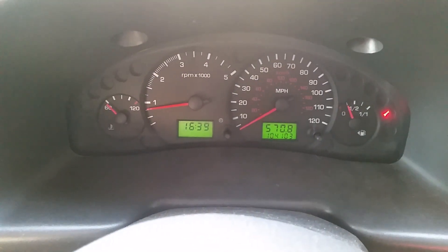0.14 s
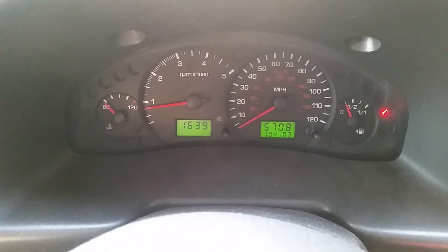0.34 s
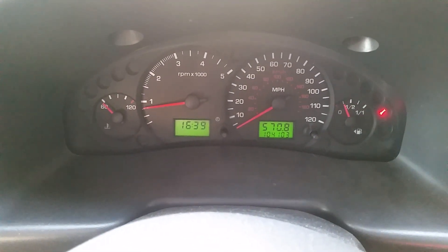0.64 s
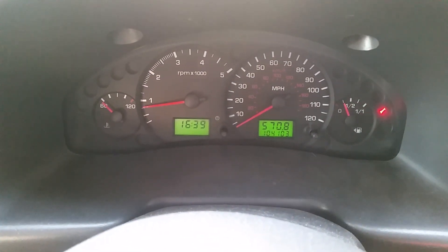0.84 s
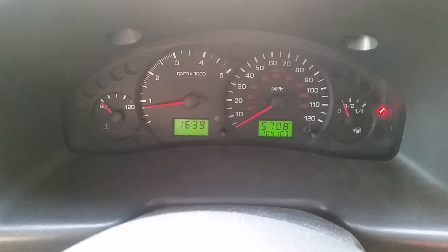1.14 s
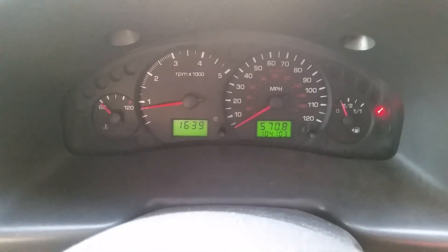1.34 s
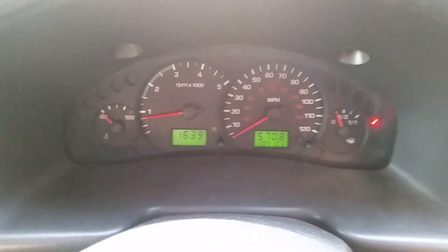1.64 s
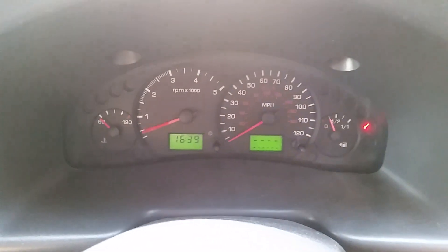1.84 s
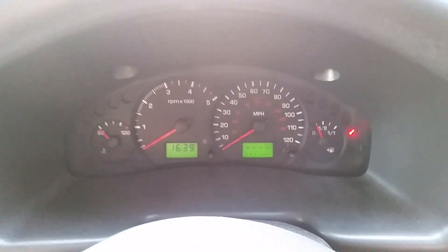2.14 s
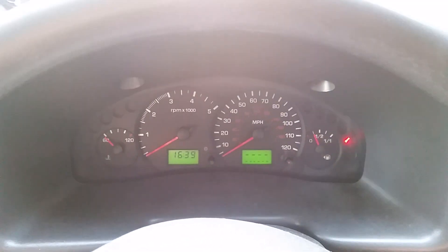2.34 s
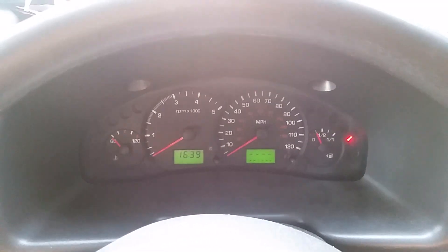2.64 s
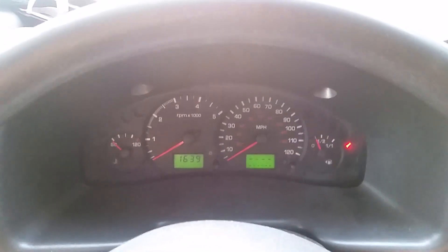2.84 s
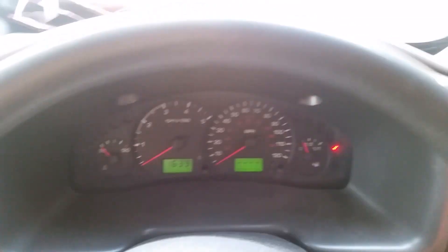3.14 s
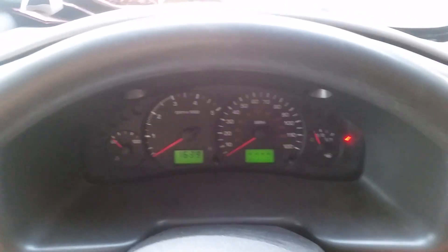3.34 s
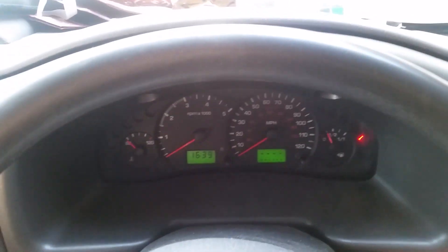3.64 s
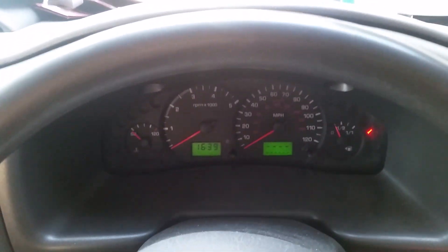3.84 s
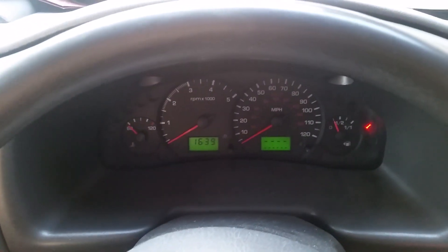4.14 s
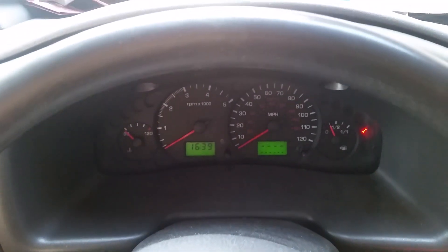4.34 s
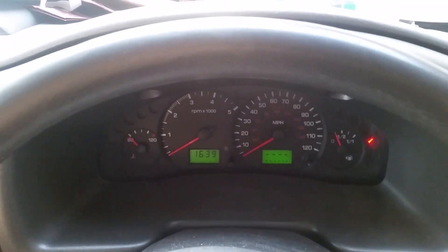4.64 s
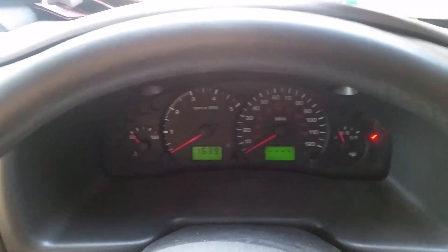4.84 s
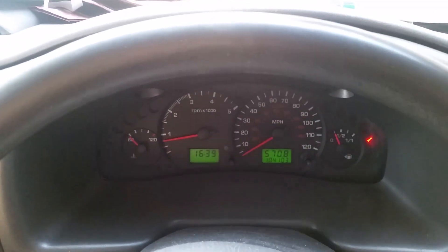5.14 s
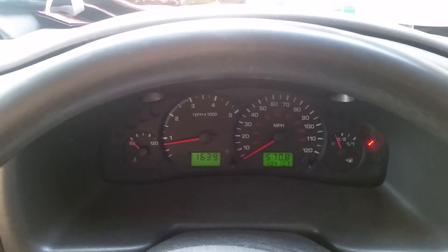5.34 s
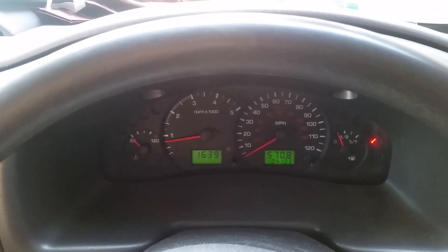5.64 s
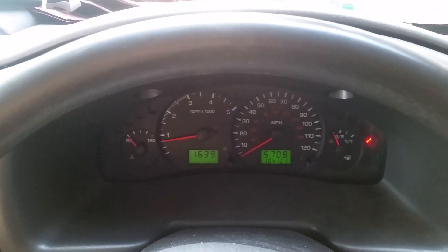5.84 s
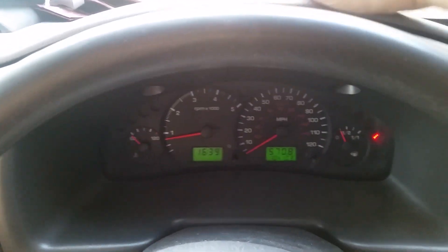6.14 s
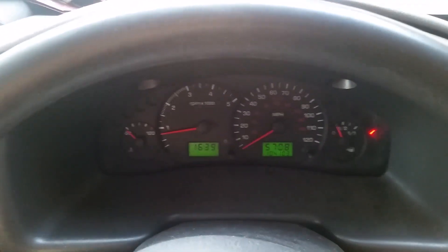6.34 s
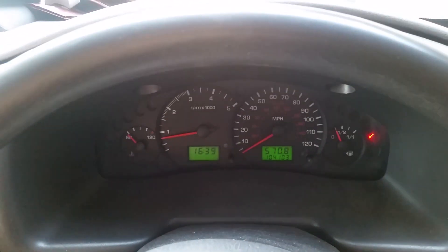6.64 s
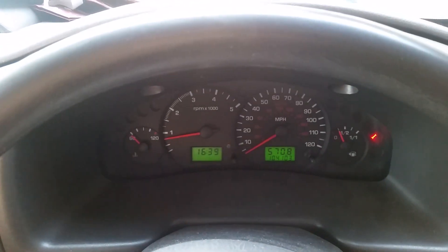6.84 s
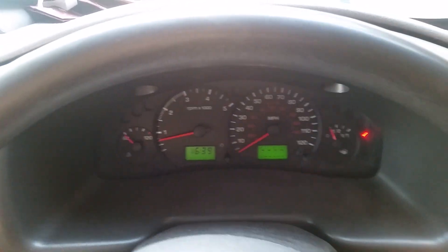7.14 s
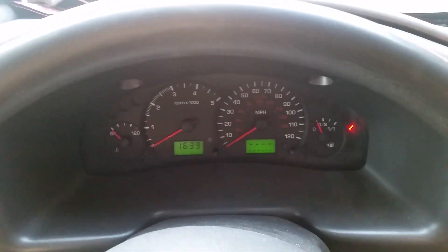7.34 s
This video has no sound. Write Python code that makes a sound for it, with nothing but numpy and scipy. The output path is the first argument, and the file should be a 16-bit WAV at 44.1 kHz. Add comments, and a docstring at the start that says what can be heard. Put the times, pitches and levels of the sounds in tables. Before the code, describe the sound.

A diesel van idles steadily with a boomy metallic knock inside the cabin, while two hard hand slaps on the dashboard briefly duck the sound.

```python
"""A four-cylinder diesel van idles, heard from the driver's seat through a hand-held phone that opens turned down.
Firing pulses drive the cabin air into a boom, and metallic blows ring the bulkhead and the block; a faint hiss lies over.
A whining rustle of noise and narrow resonances comes and goes; a sleeve swishes as noise while the phone is drawn back.
Trim ticks in short noise bursts, plastic squeaks with an arching tone, and the hand bumps the phone as its grip shifts.
Then a hand slaps the dashboard twice, ringing its modes; each time the gain control ducks, holds and recovers."""
import sys
import numpy as np
from scipy import signal
from scipy.fft import rfft, irfft, next_fast_len
from scipy.io import wavfile
from scipy.ndimage import uniform_filter1d, minimum_filter1d

SR = 44100
rng = np.random.default_rng(int(sys.argv[2]) if len(sys.argv) > 2 else 0)


def waveform_to_disk(signal):
    """Save audio, clipped to [-1, 1], as 16-bit WAV at the path in sys.argv[1]."""
    frames = np.transpose(np.atleast_2d(signal))
    scaled = np.clip(frames, -1, 1) * 32767
    samples = np.round(scaled).astype(np.int16)
    wavfile.write(sys.argv[1], SR, samples)


N = 330309
T = np.arange(N) / SR  # seconds


def undb(db):
    """Logarithmic level: turn decibels into an amplitude gain."""
    return 10 ** (np.asarray(db) / 20)


def level(x, db):
    """Effective value: scale a sound to an rms level in dB."""
    return x * undb(db) / np.sqrt(np.mean(x ** 2))


def along(points, hz):
    """Logarithmic pitch: interpolate (Hz, value) points along a log-frequency axis."""
    f, value = np.transpose(points)
    return np.interp(np.log(hz + 1), np.log(f), value)


def through(x, response):
    """Linear superposition: convolve a sound with an impulse response."""
    return signal.fftconvolve(x, response)[:len(x)]


def colour(x, points, size=16384):
    """Minimum phase: a folded cepstrum gives the causal filter with this (Hz, dB) shape."""
    log_gain = np.log(undb(along(points, np.fft.rfftfreq(size, 1 / SR))))
    cepstrum = irfft(log_gain)
    cepstrum[1:size // 2] *= 2
    cepstrum[size // 2 + 1:] = 0
    return through(x, irfft(np.exp(rfft(cepstrum))))


# Sound scattered by glass and trim, different at each microphone.
# Each row: frequency in Hz, level in dB against the direct sound.
SCATTERED_SOUND = [(60, -8.5), (250, -2.5), (1000, 4), (8000, 8.5)]


def noise(points, count=N):
    """Partial coherence: two-channel noise of rms 1, a shared direct part plus separate scatter."""
    hz = np.fft.rfftfreq(next_fast_len(count, real=True), 1 / SR)
    white = rng.standard_normal((3, len(hz))) + 1j * rng.standard_normal((3, len(hz)))
    direct, scattered = white[0], white[1:] * undb(along(SCATTERED_SOUND, hz))
    spectrum = (direct + scattered) * undb(along(points, hz))
    return level(irfft(spectrum)[:, :count], 0)


def impulses(times, sizes):
    """Impulsive excitation: one impulse of the given size at each time."""
    samples = np.clip(np.asarray(times) * SR, 0, N).astype(int)
    return np.bincount(samples, sizes, N + 1)[:N]


def fade(t60, rise):
    """Exponential decay: a one-second envelope that swells (rise, s) and dies away (t60, s)."""
    t = T[:SR]
    return (1 - np.exp(-t / rise)) * np.exp(-np.log(1000) * t / t60)


def ring(modes, rise):
    """Modal superposition: the impulse response of (Hz, dB, t60) modes is a sum of decaying sines."""
    return sum(undb(db) * fade(t60, rise) * np.sin(2 * np.pi * hz * T[:SR]) for hz, db, t60 in modes)


def swell(middle_s, spread_s):
    """Gaussian envelope: a bell-shaped rise and fall."""
    return np.exp(-.5 * ((T - middle_s) / spread_s) ** 2)


START_TURN = .264  # share of a firing period already gone at 0 s
# the idle starts a little fast and settles: firings per second, extra firings per second, time constant
IDLE_HZ, FAST_HZ, SETTLE_S = 26.651, .28, .5


def firings():
    """Phase accumulation: a cylinder fires whenever the running phase passes a whole number."""
    rate = IDLE_HZ + FAST_HZ * np.exp(-T / SETTLE_S)
    turns = START_TURN + np.cumsum(rate) / SR
    number = np.arange(int(turns[-1]) + 1)
    return np.interp(number, turns, T), rate.mean()


# Air modes of the cabin, in which the push lingers. Each row: frequency in Hz, width in Hz.
CABIN_AIR_MODES = [(75, 10), (104.7, 10), (212.8, 10)]


def smear(x):
    """Group delay: all-pass filters make sound near a mode of the cabin air arrive late."""
    for hz, width_hz in CABIN_AIR_MODES:
        poles = signal.iirpeak(hz, hz / width_hz, fs=SR)[1]
        x = signal.lfilter(poles[::-1], poles, x)
    return x


# Spectrum of the cabin boom. Each row: multiple of the firing rate, relative level in dB.
BOOM_ORDERS = [(1, 3.5), (2, -6), (3, -7.5), (4, -14.5), (5, -6.5), (6, -11), (7, -18), (8, -14.5),
               (9, -19.5), (10, -20), (11, -19.5), (12, -22.5), (13, -25.5), (14, -32), (15, -52.5),
               (16, -46.5)]


def cabin_boom(times, mean_rate, push):
    """Harmonic excitation: the cabin air passes only the low orders of the periodic push."""
    orders = [(k * mean_rate, db) for k, db in BOOM_ORDERS]
    shape = [(12, -25)] + orders + [(700, -55), (2000, -100)]
    return smear(colour(impulses(times, undb(0.35 * push)), shape))


# Knock strength of the cylinders. Each entry: relative level in dB, in firing order.
CYLINDER_KNOCKS_DB = [-2.65, -0.26, -1.9, -0.099]
# Metallic blows within every firing. Each row: delay in ms, relative level in dB.
FIRING_BLOWS = [(3.55, -3.6), (6.97, 0), (13.1, 0), (18.13, -4), (22.01, -4)]


def metallic_blows(times, force, late):
    """Impact excitation: unequal cylinders strike runs of blows that limp once in four firings."""
    strength = undb(np.resize(CYLINDER_KNOCKS_DB, len(times)) + 0.47 * force)
    blows = np.zeros(N)
    for ms, db in FIRING_BLOWS:
        scatter_db = .4 * rng.standard_normal(len(times))
        blows += impulses(times + ms / 1000 + .00004 * late, strength * undb(db + scatter_db))
    return blows, strength


# the phone starts near the bulkhead and is drawn back: extra ring while near, middle and spread of the move
NEAR_DB, DRAW_BACK_S, DRAW_SPREAD_S = 3, 2.105, 0.33
# Modes of the bulkhead. Each row: frequency in Hz, relative level in dB, t60 in seconds.
BULKHEAD_MODES = [(319, -9.5, .17), (501.6, 1.2, .16), (530.4, -9.5, .137), (585, -11, .12),
                  (699.5, -.5, .085), (850, -4.5, .07), (1510, -17, .079)]


def bulkhead_knock(blows):
    """Modal resonance: blows ring the bulkhead, louder while the phone is near it."""
    near = undb(NEAR_DB * (1 - np.tanh((T - DRAW_BACK_S) / DRAW_SPREAD_S)) / 2)
    return near * through(blows, ring(BULKHEAD_MODES, rise=0.0012))


# Spectrum of block and loose clatter. Each row: frequency in Hz, relative level in dB per Hz.
CLATTER_SPECTRUM = [(400, -22), (800, 6), (1200, 4.5), (1550, 4), (2000, -0.5), (2400, -6), (2950, 2),
                    (3600, -4), (4500, -17.5), (6000, -36), (9000, -44.5)]


def block(blows):
    """High modal density: countless modes answer every blow with the same short noise burst."""
    burst = noise(CLATTER_SPECTRUM)[:, :SR] * fade(t60=0.18, rise=0.0024)
    return np.array([through(blows, side) for side in burst])


def loose_clatter(flare):
    """Amplitude modulation: a steady clatter flares with each knock."""
    return noise(CLATTER_SPECTRUM) * (1 + 0.06 * flare)


# Spectrum of the rumble. Each row: frequency in Hz, relative level in dB per Hz.
RUMBLE_SPECTRUM = [(20, -29), (55, -3), (100, -3.5), (160, -8), (270, -3), (340, -9.5), (395, -12.5),
                   (520, -11.5), (700, -14), (1100, -36.5), (2000, -59)]


def rumble(flare):
    """Amplitude modulation: a steady low churn flares with each knock."""
    return noise(RUMBLE_SPECTRUM) * (1 + 0.12 * flare)


RATTLE_DELAY_S = 0.00856
# Spectrum of rattling panels. Each row: frequency in Hz, relative level in dB per Hz.
RATTLE_SPECTRUM = [(200, -30), (400, -10), (560, 13.5), (680, -3), (860, -17), (1200, -15.5), (2500, -31),
                   (6000, -77)]


def panel_rattle(times, strength):
    """Gated noise: panels rattle once, a little late, in every firing."""
    shakes = impulses(times + RATTLE_DELAY_S, strength)
    return noise(RATTLE_SPECTRUM) * through(shakes, fade(t60=0.035, rise=0.0037))


def engine():
    """Common excitation: every firing pushes the cabin air and sets off a quick run of metallic blows."""
    times, mean_rate = firings()
    push, force, late = rng.standard_normal((len(times), 3)).T
    blows, strength = metallic_blows(times, force, late)
    flare = level(through(blows, fade(t60=0.11, rise=0.001)), 0)
    low = level(cabin_boom(times, mean_rate, push), -25.5) + level(rumble(flare), -37.0)
    knock = level(bulkhead_knock(blows), -37.5) + level(block(blows), -52.5)
    loose = level(panel_rattle(times, strength), -46.0) + level(loose_clatter(flare), -48.0)
    return low + knock + loose


# Spectrum of the faint hiss. Each row: frequency in Hz, relative level in dB per Hz.
HISS_SPECTRUM = [(1000, 1), (5000, -10.5), (7200, -36), (9000, -1), (12000, 1.5), (15500, 7)]


def faint_hiss():
    """Stationary noise: a steady, shaped random signal."""
    return undb(-58) * noise(HISS_SPECTRUM)


WHINE_EDGE_S = 0.08
# Passages of the rustle. Each row: start in seconds, end in seconds, level in dB.
WHINE_PASSAGES = [(1.333, 1.95, -60.5), (3.97, 4.62, -63.5), (4.9, 5.245, -33.5), (7.31, 7.602, -49)]
# Narrow resonances in the rustle. Each row: frequency in Hz, width in Hz, relative level in dB.
WHINE_RESONANCES = [(4900, 89.4, -5), (6250, 110, -9), (8300, 280, -4.5), (10450, 200, -6.5),
                    (11500, 130, -4.5)]
# Spectrum of the hiss around them. Each row: frequency in Hz, relative level in dB per Hz.
RUSTLE_SPECTRUM = [(3000, -18), (5000, -7.5), (7000, -8.5), (10500, -1.5), (12000, -8), (13500, -5),
                   (16000, -13.5)]


def whine():
    """Resonant filtering: narrow peaks make a high rustle whine as it fades in, holds and fades out."""
    gate = np.zeros(N)
    for start, end, db in WHINE_PASSAGES:
        opening, closing = np.tanh((T - start) / WHINE_EDGE_S), np.tanh((T - end) / WHINE_EDGE_S)
        gate += undb(db) * (opening - closing) / 2
    air = noise(RUSTLE_SPECTRUM)
    tones = np.zeros_like(air)
    for hz, width, db in WHINE_RESONANCES:
        tones += undb(db) * signal.lfilter(*signal.iirpeak(hz, hz / width, fs=SR), air)
    return gate * level(air + level(tones, -5), 0)


# Spectrum of the sliding sleeve. Each row: frequency in Hz, relative level in dB per Hz.
SLEEVE_SPECTRUM = [(500, -1), (1600, 14), (3000, 8.5), (4500, 6.5), (6500, 1), (8500, 6.5), (15500, 6)]


def sleeve():
    """Friction noise: a sleeve slides as the phone is drawn back."""
    return undb(-42.0) * swell(DRAW_BACK_S, 0.13) * noise(SLEEVE_SPECTRUM)


# Ticks of plastic trim. Each row: start in seconds, level in dB, centre in Hz, half width in octaves.
TRIM_TICKS = [(2.689, -52, 12000, 0.41), (2.813, -40.5, 3580, .22), (3.797, -52, 10500, 0.73),
              (3.887, -49, 11500, 1.0), (4.777, -57, 9000, 1), (6.065, -46.5, 4300, 0.15),
              (6.101, -55, 9500, 0.45), (6.435, -31, 10200, 0.98)]


def trim_ticks():
    """Band-limited transient: each tick is a quickly dying burst of noise around one centre."""
    out = np.zeros((2, N))
    # steps in half widths, with the level there in dB
    skirts = ((-4, -35), (-1, -10), (0, 0), (1, -12), (4, -26))
    for s, db, hz, octaves in TRIM_TICKS:
        shape = [(hz * 2 ** (octaves * step), skirt_db) for step, skirt_db in skirts]
        tick = fade(t60=0.09, rise=0.00089) * noise(shape, count=SR)
        out[:, int(s * SR):int(s * SR) + SR] += undb(db) * tick
    return out


def squeak(at_s=2.775, length_s=.13, top_hz=5250, sag_hz=850, db=-54.5):
    """Frequency modulation: plastic slips on plastic in a thin, rough tone that arches up and back."""
    place = np.clip(2 * (T - at_s) / length_s, -1, 1)
    hz = top_hz - sag_hz * place ** 2 + 700 * rng.standard_normal(N)
    return undb(db) * (1 - place ** 2) * np.sin(2 * np.pi * np.cumsum(hz) / SR)


# the hand shifts its grip on the phone: middle and spread, gain of its soft bumps
GRIP_S, GRIP_SPREAD_S, GRIP_DB, BUMPS_PER_S = 3.76, 0.21, -29, 9


def grip(count=80):
    """Random impacts: fingers bump the phone at uneven intervals while the grip shifts."""
    times = (np.arange(count) + rng.random(count)) / BUMPS_PER_S
    touches = impulses(times, np.ones(count)) * undb(GRIP_DB) * swell(GRIP_S, GRIP_SPREAD_S)
    thud = noise([(30, -2), (70, -1.5), (150, 3), (260, -16.5), (1000, -66.5)])
    return through(touches, fade(t60=0.39, rise=0.0067)) * thud


# each flight of the panel as a share of the last; first clap's thump against the slap, then change per clap
REBOUND, CLAP_THUMP_DB, CLAP_LOSS_DB = 1, -31, -16.5
# Hand slaps. Each row: start in seconds, thump in dB, crack in dB, approximate length of the push in ms,
# first flight of the loose panel in seconds, its first clap in dB against the crack.
HAND_SLAPS = [(4.8337, 2.5, -11.5, 3.33, .057, -5.5), (6.1859, -2, -14, 1.66, .034, -8.5)]
# Modes of the dashboard. Each row: frequency in Hz, relative level in dB, t60 in seconds.
DASH_MODES = [(62.5, -20.5, 0.44), (86.8, -11.5, 0.39), (112.8, -8.5, 0.17), (140.3, -14, 0.37),
              (167.5, -2.5, 0.15), (207, 3, 0.066), (249.3, 2, 0.066), (325, -5.5, 0.085)]
# Dull echo of the cabin after a thump. Each row: frequency in Hz, relative level in dB per Hz.
CABIN_ECHO = [(35, -20), (70, -3), (110, -3), (220, -5), (400, -21.5), (1000, -19.5), (3000, -48)]
# Stiff modes of the plastic trim. Each row: frequency in Hz, relative level in dB, t60 in seconds.
TRIM_MODES = [(653, -10.5, 0.13), (838, -18, 0.21), (995, -9.5, .22), (1320, -23.5, 0.22),
              (1694, -7.5, 0.14), (2010, -28, 0.22), (2375, -20, 0.15), (15300, -34, .45)]
# Spectrum of the crack. Each row: frequency in Hz, relative level in dB per Hz.
CRACK_SPECTRUM = [(40, -13.5), (130, 3), (300, 17), (450, 7), (700, 11.5), (1100, 3), (1900, -1.5),
                  (2800, -5.5), (4000, -17.5), (6300, -46.5), (8500, -20), (15500, -22)]


def dashboard(count=3):
    """Impact and rebound: a slap cracks and bends the panel, which claps back evenly and ever softer."""
    clap = np.arange(count)
    force, contacts = np.zeros(N), np.zeros(N)
    for s, thump_db, crack_db, push_ms, flight_s, clap_db in HAND_SLAPS:
        times = s + np.r_[0, np.cumsum(flight_s * REBOUND ** clap)]
        # a longer push sounds deeper
        push = np.hanning(int(push_ms * SR / 1000) + 3)
        weights = undb(thump_db + np.r_[0, CLAP_THUMP_DB + CLAP_LOSS_DB * clap])
        force += through(impulses(times + 0.00309, weights), push / push.sum())
        contacts += impulses(times, undb(crack_db + np.r_[0, clap_db + CLAP_LOSS_DB * clap]))
    thump = through(force, ring(DASH_MODES, rise=0.0027))
    echo = undb(-10) * through(force, fade(t60=0.24, rise=0.0043)) * noise(CABIN_ECHO)
    skin = fade(t60=.025, rise=.0002)
    plastic = fade(t60=0.12, rise=0.00034)
    loose_parts = undb(-31.5) * fade(t60=0.89, rise=.02)
    crack = through(contacts, skin + plastic + loose_parts) * noise(CRACK_SPECTRUM)
    return thump + echo + through(contacts, ring(TRIM_MODES, rise=0.0013)) + crack


# Balance of the microphones. Each row: frequency in Hz, left minus right in dB.
LEFT_MINUS_RIGHT = [(60, 1.5), (200, 1), (400, 2), (700, 5), (1300, 7), (2400, 12), (4400, 3), (8000, 3.5),
                    (15000, 4.5)]


def microphones(x, lag_s=.00027):
    """Interchannel difference: the left hears the cabin later but louder, above all in the middle range."""
    left = np.interp(T - lag_s, T, x[0])
    left_shape = [(hz, db / 2) for hz, db in LEFT_MINUS_RIGHT]
    right_shape = [(hz, -db / 2) for hz, db in LEFT_MINUS_RIGHT]
    return np.array([colour(left, left_shape), colour(x[1], right_shape)])


def scene():
    """Superposition: engine, hiss, rustle, handling and slaps add up at the two microphones."""
    handling = sleeve() + trim_ticks() + squeak() + grip()
    return microphones(engine() + faint_hiss() + whine() + handling + dashboard())


def glide(x, lag_s):
    """Second-order lag: follow a control smoothly and a little late."""
    keep = np.exp(-1 / (lag_s * SR))
    return x[0] + signal.lfilter([(1 - keep) ** 2], np.poly([keep, keep]), x - x[0])


# the last of the cut lets go slowly: its share, and its time constant
LINGER, LINGER_S = 0.071, 0.34


def gain_cut(x, threshold_db=-22, slope=0.98, hold_s=0.66, release_db_per_s=42, lag_s=0.097,
             opening_db=18.5, opening_s=0.2):
    """Dynamic compression in dB: it starts turned down, cuts after a loud peak, holds, then lets go."""
    power = uniform_filter1d(np.mean(x ** 2, axis=0), size=1500)
    loud_db = 10 * np.log10(np.abs(power) + 1e-12)
    cut = slope * np.maximum(loud_db - threshold_db, 0)
    span = int(hold_s * SR)
    # the largest cut of the last moments is held
    cut = -minimum_filter1d(-cut, span, origin=(span - 1) // 2, mode="constant")
    cut = np.maximum(cut, opening_db * (T < opening_s))
    release = release_db_per_s * T
    cut = np.maximum.accumulate(cut + release) - release
    # the gain glides, so the first instant of a slap gets through almost whole
    return (1 - LINGER) * glide(cut, lag_s) + LINGER * glide(cut, LINGER_S)


PREAMP_DB = -90  # hiss of the phone itself, which the gain control does not lower
TOP_HZ = 15800
# How deeply each range follows the gain control. Each row: frequency in Hz, share of the cut.
DUCKING_DEPTH = [(600, 1.02), (1300, 1.32), (3300, 1.46), (6000, 3.27)]


def record(dry, size=512):
    """Multiband compression: the phone ducks treble most, adds hiss, clips at full scale and cuts the top."""
    hz, s, frames = signal.stft(dry, SR, nperseg=size)
    cut = np.outer(along(DUCKING_DEPTH, hz), np.interp(s, T, gain_cut(dry)))
    ducked = signal.istft(frames * undb(-cut), SR, nperseg=size)[1][:, :N]
    hissing = ducked + undb(PREAMP_DB) * rng.standard_normal((2, N))
    low_pass = signal.ellip(10, .2, 70, TOP_HZ, fs=SR, output="sos")
    return signal.sosfilt(low_pass, np.clip(hissing, -1, 1))


dry = scene()
out = record(dry)
waveform_to_disk(out)
```